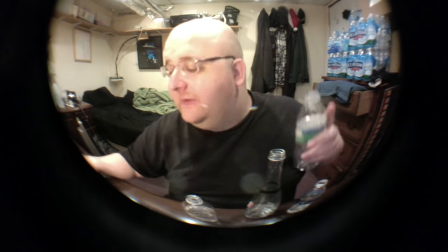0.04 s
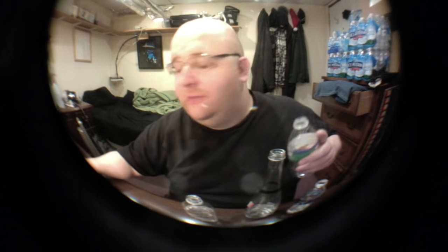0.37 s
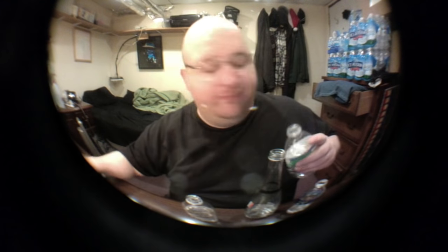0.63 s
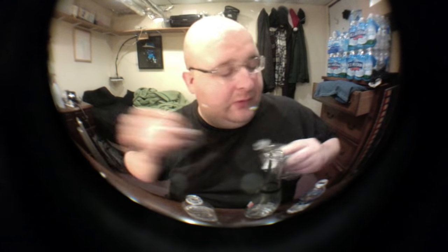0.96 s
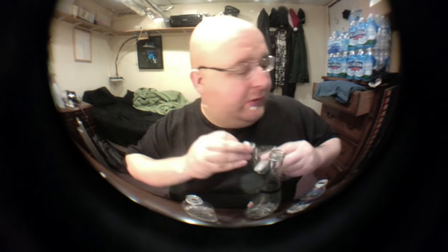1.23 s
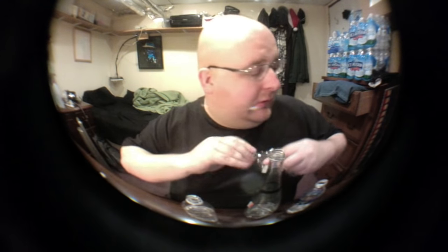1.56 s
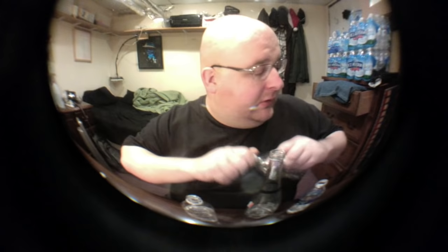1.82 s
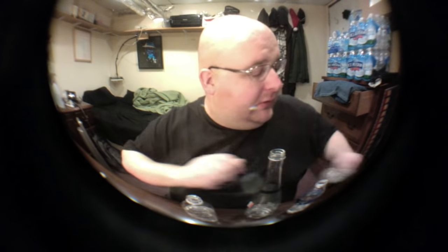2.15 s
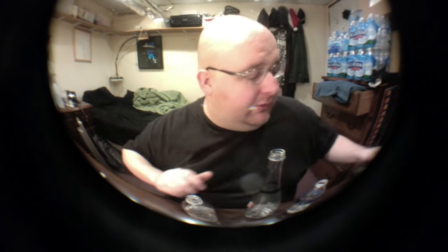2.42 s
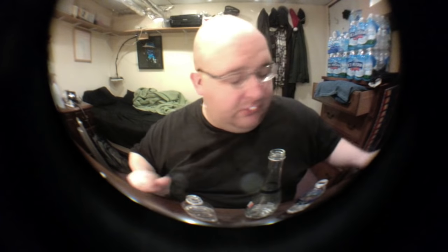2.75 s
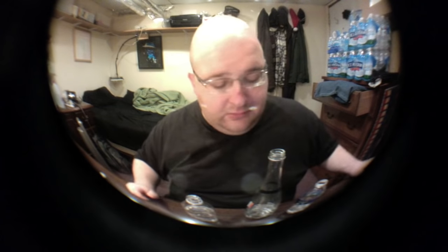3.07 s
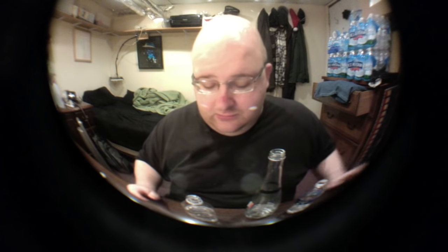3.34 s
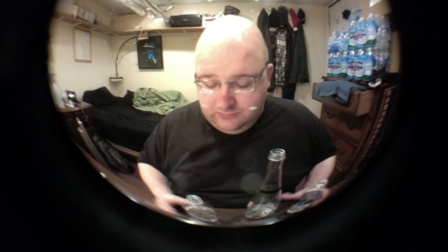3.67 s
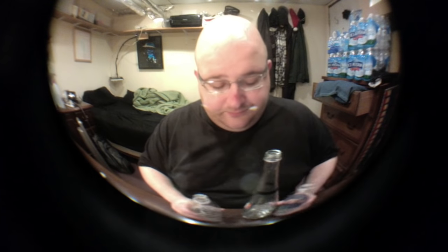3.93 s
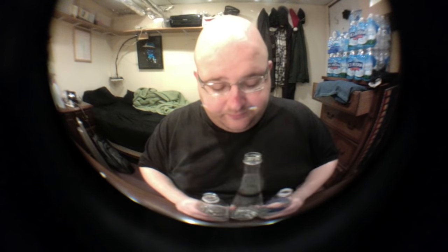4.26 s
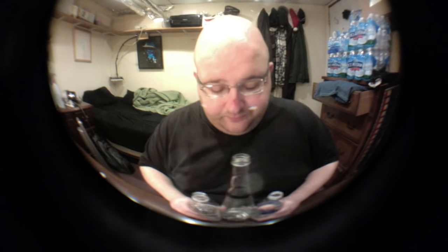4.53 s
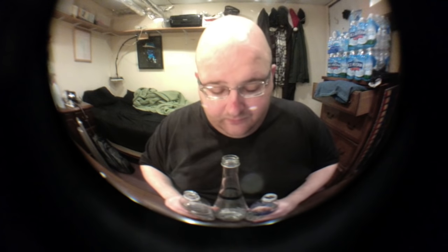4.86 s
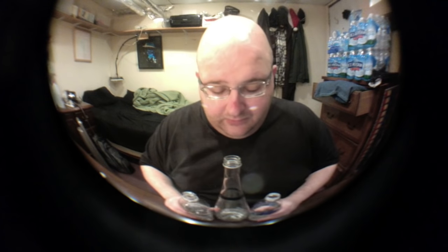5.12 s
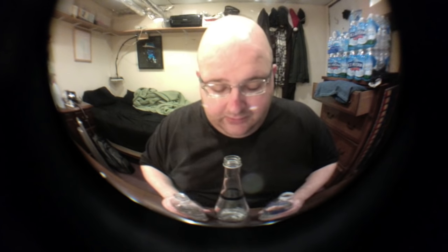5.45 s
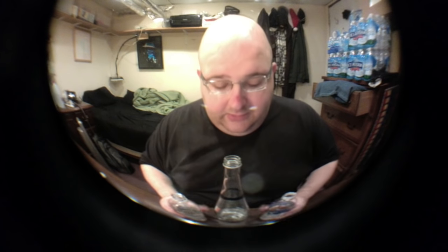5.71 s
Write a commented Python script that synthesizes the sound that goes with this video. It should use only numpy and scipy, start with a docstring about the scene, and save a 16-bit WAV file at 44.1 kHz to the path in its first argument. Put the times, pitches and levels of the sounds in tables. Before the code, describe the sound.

In a small room with a faint electrical hum, a plastic bottle crackles loudly and very close as a hand crushes its thin wall. It ticks and pops more softly, crinkles once more and rattles hollowly as it is set down. Afterwards, much quieter, glass bottles bump and slide on a tabletop, squeaking faintly and clinking once, before a last small tick.

```python
"""Loud snaps come first: a thin plastic water bottle is squeezed close by, and its wall buckles.
It creaks and crackles among small ticks and pops, then is put aside with a hollow clatter.
Other bottles are nudged about the table: they bump, slide, squeak faintly and clink.
A small room answers every snap; under it all lie a mains hum and a soft fan-like rush."""
import sys
import numpy as np
from scipy import signal
from scipy.fft import rfft, irfft, next_fast_len
from scipy.io import wavfile
from scipy.ndimage import map_coordinates

SR = 44100
rng = np.random.default_rng(int(sys.argv[2]) if len(sys.argv) > 2 else 0)


def unload_audio(sound):
    """Save the sound as a 16-bit wav file, at the path given as the first command line argument."""
    columns = np.transpose(np.atleast_2d(sound))
    # keep every value between -1 and 1, then stretch to whole-number steps
    steps = np.round(np.clip(columns, -1, 1) * 32767)
    wavfile.write(sys.argv[1], SR, steps.astype(np.int16))


N = 259572
TIME = np.arange(N) / SR  # seconds through the whole scene
T = np.arange(SR // 3) / SR  # seconds inside one short sound
TOP_HZ = 15750  # the microphone's upper limit


def amp(db):
    """Turn decibels into a gain to multiply by."""
    return 10 ** (np.asarray(db) / 20)


def unit(x):
    """Scale a sound to an average strength (rms) of 1."""
    return x / np.sqrt(np.mean(x ** 2) + 1e-20)


def unit_energy(x):
    """Scale a sound to a total energy of 1."""
    return x / np.linalg.norm(x)


def along(points, hz):
    """Read between (pitch_hz, value) points, spaced the way the ear hears pitch."""
    pitches, values = np.transpose(points)
    return np.interp(np.log(hz + 1), np.log(pitches + 1), values)


def level(rows):
    """A gain that glides through (time_s, level_db) rows and is silent outside them."""
    times, db = np.transpose(rows)
    return amp(np.interp(TIME, times, db, left=-120, right=-120))


def filtered(x, response):
    """Turn each frequency of x up or down by the gain response(hz)."""
    size = next_fast_len(N + SR // 4)
    return irfft(rfft(x, size) * response(np.fft.rfftfreq(size, 1 / SR)), size)[:N]


def band(x, low_hz, high_hz):
    """Keep one range of frequencies, scaled to a strength of 1."""
    edges = np.minimum([low_hz, high_hz], SR / 2 - 100)
    return unit(signal.sosfilt(signal.butter(3, edges, btype="band", fs=SR, output="sos"), x))


def resonances(f, modes):
    """How a thing that rings at (pitch_hz, width_hz, level_db) modes answers the frequencies f."""
    return sum(amp(db) * 1j * f * width / (hz ** 2 - f ** 2 + 1j * f * width) for hz, width, db in modes)


def noise(spectrum):
    """Noise of strength 1, coloured by (pitch_hz, level_db) points."""
    return unit(filtered(rng.standard_normal(N), lambda hz: amp(along(spectrum, hz))))


def wobble(per_s):
    """A smooth curve through per_s random values each second."""
    return map_coordinates(rng.standard_normal(int(N * per_s / SR) + 4), [TIME * per_s])


def fade(fade_s, t=T):
    """Die away by 60 dB in fade_s seconds."""
    return np.exp(-np.log(1000) * t / fade_s)


def rise(rise_s):
    """Swell from 0 towards 1, about two thirds of the way after rise_s seconds."""
    return 1 - np.exp(-T / rise_s)


def burst(contact_s):
    """A push of noise that is strongest after contact_s seconds."""
    return rng.standard_normal(len(T)) * (T / contact_s) ** 2 * np.exp(-2 * T / contact_s)


def add(track, start_s, sound):
    """Mix a sound into the track at start_s."""
    part = track[max(round(start_s * SR), 0):][:len(sound)]
    part += sound[:len(part)]


# the hum's tones, compared with the rush: pitch_hz, level_db
HUM_TONES = [(120, -8.5), (470, -15), (610, -8.5)]
# the colour of the rush: pitch_hz, level_db
RUSH_COLOUR = [(30, -42), (70, -17), (110, -4), (180, -11), (300, -8), (450, -4), (600, 0), (800, -5),
               (1100, -15), (2000, -18), (4000, -27), (6500, -28), (9000, -37), (15000, -43)]
# how loud hum and rush are over time: time_s, level_db
BACKGROUND_LEVEL = [(0, -61), (1.7, -60.5), (2.0, -65), (2.8, -62), (3.7, -59), (4.6, -67), (5.25, -67),
                    (5.6, -59.5)]
def hum_and_fan():
    """Mains hum with faint upper tones and the rush of a fan, slowly wavering together."""
    hum = sum(amp(db) * np.sqrt(2) * np.sin(2 * np.pi * (hz * TIME + rng.random()))
              for hz, db in HUM_TONES)
    level_db = np.interp(TIME, *np.transpose(BACKGROUND_LEVEL))
    return amp(level_db) * (hum + noise(RUSH_COLOUR))


# how long the small room rings: pitch_hz, fade_s
ROOM_FADES = [(150, .19), (500, .19), (1500, .17), (6000, .155), (15000, .125)]
def room_tail():
    """The room's blurred answer to a click; high sounds die sooner than low ones."""
    hz, t, spectrum = signal.stft(rng.standard_normal(len(T)), SR, nperseg=256)
    fading = spectrum * fade(along(ROOM_FADES, hz)[:, None], t)
    tail = signal.istft(fading, SR, nperseg=256)[1][:len(T)]
    return unit_energy(tail * rise(0.0016))


def with_echoes(x, echo_db, room_db=-6.5):
    """A short sound, its quick echoes off hand and table, and the room's tail."""
    direct = unit_energy(x)
    bounces = rng.standard_normal(len(T)) ** 3 * fade(0.095) * (T > .002)
    echoes = unit_energy(signal.fftconvolve(direct, bounces)[:len(T)])
    return direct + amp(echo_db) * echoes + amp(room_db) * room_tail()


def squeak(hold_s, pitch_hz, waver_hz=22, flutter_db=4.0):
    """Glass sticks and slips so fast that it sings one thin, unsteady note."""
    envelope = rise(0.0048) * fade(0.11, np.maximum(T - hold_s, 0))
    phase = 2 * np.pi * np.cumsum(pitch_hz + waver_hz * wobble(170)[:len(T)]) / SR
    return envelope * amp(flutter_db * wobble(70)[:len(T)]) * np.sin(phase)


# how loud the scraping is: time_s, level_db
SCRAPE_LEVEL = [(3.1, -85), (3.5, -68), (3.85, -66), (4.3, -70), (4.48, -90)]
# the colour of the scraping: pitch_hz, level_db
SCRAPE_COLOUR = [(300, -10), (700, 0), (1300, -3), (2200, -2), (4000, -10), (6500, -11), (8000, -18),
                 (15000, -24)]
# the rough notes of dragged glass: pitch_hz, width_hz, level_db
DRAG_NOTES = [(3230, 60, 0), (5430, 110, -4), (6900, 110, -5)]
# how loud those notes are together: time_s, level_db
DRAG_LEVEL = [(3.5, -86), (3.85, -76), (4.4, -86), (4.6, -96), (5.0, -80), (5.38, -79), (5.6, -92)]
# a glass base singing as it is pushed: start_s, hold_s, level_db, pitch_hz
GLASS_SQUEAKS = [(3.778, 0.048, -59.5, 3360), (3.82, .04, -65, 2100), (3.86, .04, -61.5, 3350),
                 (3.875, 0.049, -69, 5880), (3.96, 0.036, -72.5, 3350), (5.008, .02, -77.5, 3220)]
def sliding(judders_per_s=30, judder_db=1.67, catch_db=4.0):
    """Bottles whisper over the table in uneven pushes; the glass rings and squeaks where it catches."""
    track = amp(judder_db * wobble(judders_per_s)) * level(SCRAPE_LEVEL) * noise(SCRAPE_COLOUR)
    for hz, width_hz, db in DRAG_NOTES:
        ring = unit(filtered(rng.standard_normal(N), lambda f: resonances(f, [(hz, width_hz, 0)])))
        track += amp(db + catch_db * wobble(judders_per_s)) * level(DRAG_LEVEL) * ring
    for start_s, hold_s, db, hz in GLASS_SQUEAKS:
        add(track, start_s, amp(db) * squeak(hold_s, hz))
    return track


# the notes of a lightly touched glass bottle: pitch_hz, level_db, fade_s
GLASS_NOTES = [(1660, -15, 0.047), (2120, -1, 0.054), (2500, -8.5, .04), (2990, -2, 0.079),
               (3395, 1.5, 0.063), (3630, -8.5, .11), (5700, -8.5, 0.035), (6750, -11, 0.069),
               (7490, -7.5, 0.11), (8030, -7.5, 0.09), (8721, -9.5, 0.09), (9850, -10, 0.098),
               (12300, -17, 0.098), (15000, -15, .04)]
# the glass is grazed, then knocked: start_s, level_db, click_top_hz, click_db
GLASS_TOUCHES = [(4.6382, -61, 7560, -5), (4.643, -56.5, 3600, -8.5)]
def clinks(click_low_hz=1300, pure_db=2):
    """A held glass bottle is touched; the hand stops its ring almost at once."""
    track = np.zeros(N)
    for start_s, level_db, click_top_hz, click_db in GLASS_TOUCHES:
        ring = np.zeros(len(T))
        for hz, db, fade_s in GLASS_NOTES:
            blur = band(rng.standard_normal(len(T)), hz * .955, hz * 1.045)
            pure = amp(pure_db) * np.sin(2 * np.pi * hz * T)
            ring += amp(db) * fade(fade_s) * (blur + pure)
        touch = with_echoes(burst(contact_s=0.00099), echo_db=-8, room_db=-5.5)
        click = amp(click_db) * band(touch, click_low_hz, click_top_hz)
        add(track, start_s, amp(level_db) * (unit(ring * rise(0.0014)) + click))
    return track


# soft bumps on the squeezed bottle, later on the table top: start_s, level_db, pitch_hz
SOFT_BUMPS = [(.066, -27.5, 318.6), (.158, -27.5, 240), (.318, -38, 140), (.364, -34, 150),
              (0.42, -35, 135), (3.437, -40.5, 279), (3.459, -47.5, 290), (3.909, -41.5, 261),
              (3.932, -44, 150.3), (4.514, -52.5, 290), (5.15, -61, 269)]
def thumps(boom_fade_s=0.13, boom_db=-2, thud_db=-20):
    """A padded bump moves only a broad panel, which booms briefly."""
    track = np.zeros(N)
    for start_s, db, hz in SOFT_BUMPS:
        boom = np.sin(2 * np.pi * hz * T) * fade(boom_fade_s) * rise(0.0033)
        thud = band(with_echoes(burst(contact_s=0.009), echo_db=0), 80, 450)
        add(track, start_s, amp(db) * (amp(boom_db) * boom + amp(thud_db) * thud))
    return track


# the notes that table and bottle ring at: pitch_hz, width_hz, level_db
HOLLOW_NOTES = [(149, 28, -14), (243.7, 23, 1.5), (410.5, 26, 2), (501, 31, -4), (692, 27, -3),
                (785, 13, -5), (867, 31, -3), (1116, 23, -4), (1390, 32, -9), (1525, 57, 0),
                (1846, 36, -10), (2136, 42, -10.5)]
# the bottle knocks and rocks as it is put aside: start_s, thud_db, hollow_db, rattle_db, sizzle_db
BOTTLE_KNOCKS = [(2.170, -47.5, -43.5, -46, -49.5), (2.178, -48.5, -41.5, -43, -47.5),
                 (2.186, -52.5, -49.5, -54, -53), (2.229, -80, -52.5, -48, -57.5),
                 (2.288, -87, -64, -48, -55), (2.296, -90, -52.5, -41, -38.5),
                 (2.333, -72, -51.5, -50.5, -51), (2.3737, -67, -38, -44, -51),
                 (2.408, -86, -45.5, -53, -69), (2.421, -67, -44, -50.5, -78), (2.444, -86, -47, -61, -86),
                 (2.485, -39.5, -36, -37, -45.5), (2.492, -49.5, -52, -50, -61),
                 (2.523, -50.5, -44.5, -47.5, -67), (2.553, -62, -50, -55, -80)]
def knocks(direct_db=-9.0, shake_db=-19):
    """Each knock thuds in the wood, sounds the hollow bottle and rattles its skin."""
    track = np.zeros(N)
    for start_s, thud_db, hollow_db, rattle_db, sizzle_db in BOTTLE_KNOCKS:
        skin = with_echoes(burst(contact_s=0.0031), echo_db=-3, room_db=3.0)
        push = with_echoes(burst(contact_s=0.0037), echo_db=-7, room_db=-7)
        thud = amp(thud_db) * (band(push, 140, 540) + amp(shake_db) * band(push, 35, 150))
        hollow = amp(hollow_db) * (band(push, 660, 1468) + amp(-1.5) * band(push, 1295, 2470))
        rattle = amp(rattle_db) * (amp(-6) * band(skin, 1880, 3050) + amp(-0.5) * band(skin, 4260, 7200))
        sizzle = amp(sizzle_db) * band(skin, 8600, 13600)
        add(track, start_s, thud + hollow + rattle + sizzle)
    return filtered(track, lambda f: amp(direct_db) + resonances(f, HOLLOW_NOTES))


# small ticks and pops: start_s, level_db, low_pitch_hz, high_pitch_hz
SMALL_TICKS = [(0.7312, -24.5, 1625, 2720), (0.9338, -32, 3040, 3500), (0.959, -30.5, 3930, 4930),
               (1.1022, -30, 2106, 2600), (1.158, -41, 1430, 2750), (1.664, -46.5, 2310, 2440),
               (3.897, -40, 3590, 5000), (4.7199, -50.5, 2840, 3450), (5.313, -52.5, 4265, 9900),
               (5.8215, -35.5, 1570, 2487)]
def pops(ring_db=-31, ring_fade_s=0.059):
    """Small, short ticks and pops, each ringing at two pitches."""
    track = np.zeros(N)
    for start_s, db, low_hz, high_hz in SMALL_TICKS:
        push = with_echoes(burst(contact_s=0.0015), echo_db=-5, room_db=-5.5)
        low_tick = amp(-28) * band(push, low_hz * 0.827, low_hz * 1.132)
        high_tick = amp(-26) * band(push, high_hz * 0.876, high_hz * 1.17)
        notes = sum(np.sin(2 * np.pi * hz * T) for hz in (low_hz, high_hz))
        ring = amp(ring_db) * unit(notes * fade(ring_fade_s) * rise(0.0024))
        add(track, start_s, amp(db) * (low_tick + high_tick + ring))
    return track


def grip(full_grip_s, hold_s, level_db, change_db_per_s, build_db_per_s=649.5, release_db_per_s=798):
    """The gain of one squeeze: it builds, is held and lets go."""
    t = TIME - full_grip_s
    building = build_db_per_s * np.minimum(t, 0)
    holding = change_db_per_s * np.clip(t, 0, hold_s)
    letting_go = release_db_per_s * np.maximum(t - hold_s, 0)
    return amp(level_db + building + holding - letting_go)


# squeezes and light shifts of the hand: full_grip_s, hold_s, level_db, change_db_per_s
HAND_SQUEEZES = [(.16, 0.31, -44, 5), (1.442, 0.065, -24, -160), (1.785, 0.034, -71.5, -100),
                 (2.05, 0.094, -71.5, 70)]
def crumpling(ticks_per_s=3500, spread_db=2.0, room_db=-3):
    """Countless tiny creases crackle while the hand squeezes, and the room answers."""
    ticks = (rng.random(N) < ticks_per_s / SR) * rng.standard_normal(N)
    ticks *= amp(spread_db * rng.standard_normal(N))
    crackle = unit(band(ticks, 1800, 15500) + amp(-7.5) * band(ticks, 640, 7500))
    crackle *= sum(grip(*squeeze) for squeeze in HAND_SQUEEZES)
    return crackle + amp(room_db) * signal.fftconvolve(crackle, room_tail())[:N]


def snap(level_db, bright_db, extra_body_db, pitch_hz, ring_cycles=55):
    """A patch of wall flips with a crack and rings briefly: tight creases bright, broad panels dull."""
    echo_db = -3 + 0.055 * bright_db + 0.022 * level_db  # dull or small snaps echo less
    flip = with_echoes(burst(contact_s=0.0006), echo_db, room_db=echo_db - 0.5)
    note = np.cos(2 * np.pi * pitch_hz * T) * fade(ring_cycles / pitch_hz)
    ring = amp(-16.5) * unit(with_echoes(note, echo_db - 0.5, room_db=echo_db - 12))
    # big, dull snaps move more of the bottle; only the big ones shake out any bass
    body_db = -32.5 - 0.53 * bright_db + 0.9 * level_db + extra_body_db
    body = amp(body_db - 4.5) * band(flip, 270, 1100)
    bass = amp(body_db - 25 + 0.45 * level_db) * band(flip, 90, 260)
    panel = amp(-21 - 0.67 * bright_db) * band(flip, 1300, 3610)
    crack = amp(-10.5) * band(flip, 3680, 6500)
    # the highest part beams away from the microphone and arrives mostly as echoes
    scattered = unit_energy(flip) + amp(0.5) * room_tail()
    sizzle = amp(-9.5 + 0.41 * bright_db) * band(scattered, 7600, 17000)
    return amp(level_db - 13.5) * (bass + body + panel + crack + ring + sizzle)


def creak(start_s=.6283, level_db=-26, slips=11, gap_s=.0088, slowing=1.033, scatter=.07):
    """A crease sticks and slips in a run of tiny snaps that gradually slow and weaken."""
    track = np.zeros(N)
    gaps = gap_s * slowing ** np.arange(slips) * np.exp(scatter * rng.standard_normal(slips))
    for k, slip_s in enumerate(start_s + np.cumsum(gaps) - gaps[0]):
        slip_db = level_db - 0.41 * k + rng.standard_normal()
        add(track, slip_s, snap(slip_db, bright_db=-5.5, extra_body_db=-3.5, pitch_hz=6700))
    return track


# the snaps of the buckling wall: start_s, level_db, bright_db, extra_body_db, pitch_hz
WALL_SNAPS = [(0.0443, -8, -7.5, 14.5, 1785), (0.0677, -8.5, -16.5, 14, 5260),
              (0.1028, -21.5, -23, 17, 2620), (0.115, -12.5, -17.5, 15.5, 2940),
              (0.1516, -6, -16, 12, 5650), (.1562, -5, -12, 9.5, 5160), (.159, -1, -6, 8.5, 6300),
              (0.192, -12.5, -24, 10, 1480), (0.1985, -3, 3, 14.5, 6060), (.212, -9, -14, 11, 5300),
              (0.235, -6, -7.5, 8, 6000), (.2452, -6, -15, 9, 4660), (0.2559, -8.5, -19, 13.5, 4360),
              (0.2691, -8.5, -14, -1, 947), (.2797, 0, -1, 5, 5940), (.2855, -9.5, -8, 14, 2860),
              (.291, -8, -21.5, -8, 2520), (0.3181, 2, -4.5, -2.5, 6830), (0.3329, -2.5, -15.5, 0.5, 4130),
              (0.3403, -5.5, -4, -2, 6250), (0.3645, 0.5, 1, -2, 6280), (0.3794, 0, -13.5, -4, 3020),
              (.3845, -6.5, 6, -7, 6330), (0.421, -1, -13.5, 7, 2890), (0.4896, -14, -12.5, -9, 6480),
              (.519, -24, -9, 0, 5960), (.619, -44, -6, 6, 5240), (0.7483, -29, -9, -2, 6400),
              (0.7791, -31, -15, -4, 1470), (0.7936, -29, -5, -5, 6600), (0.8495, -20.5, 3, -7, 5010),
              (0.97, -26, -2, -9, 5450), (0.978, -30, 0, -4, 5660), (1.0387, -30.5, -14, -5, 4380),
              (1.087, -36, -10, -4, 5730), (1.114, -32, -13, -2, 4300), (1.123, -40.5, -18, -13, 6030),
              (1.1747, -32.5, -10.5, 2, 6900), (1.1914, -33, -9, 8, 5540), (1.202, -37, -4, 2, 6800),
              (1.2087, -27, -12.5, 26, 2360), (1.216, -46, -10, 3, 6700), (1.2795, -33.5, -15, -4, 5940),
              (1.2926, -38.5, 3.5, 1, 6700), (1.302, -41, -25.5, 0, 6000), (1.32, -41.5, 0, 1, 6300),
              (1.3601, -33.5, -20.5, 21, 6050), (1.378, -35, -8, 1, 2370), (1.417, -35, -3, -5, 4400),
              (1.424, -26.5, 8, -2, 4900), (1.4333, -20, -12, 16, 5560), (1.4408, -17.5, -14.5, 7, 5600),
              (1.444, -15, -6, 6, 4930), (1.5156, -10.5, -14.5, 8.5, 3980), (1.5483, -22.5, -12, -8, 5450),
              (1.534, -32, -9, 3, 1250), (1.5584, -26.5, -21, -1, 2400)]
def buckling(neighbour_delay_s=.0035, neighbour_db=-12.5):
    """The wall gives way snap by snap; each one trips a weaker neighbour of another pitch."""
    track = np.zeros(N)
    chance = np.exp(0.33 * rng.standard_normal((len(WALL_SNAPS), 2)))
    for (start_s, db, bright_db, extra_body_db, hz), (lateness, detune) in zip(WALL_SNAPS, chance):
        add(track, start_s, snap(db, bright_db, extra_body_db, hz))
        neighbour = snap(db, bright_db, extra_body_db, min(hz * detune, TOP_HZ))
        add(track, start_s + neighbour_delay_s * lateness, amp(neighbour_db) * neighbour)
    return track


# the broad colour of the squeezed bottle's snaps, creaks and crackle: pitch_hz, level_db
BROAD_COLOUR = [(100, -3), (250, -1.5), (450, -2), (800, 5), (1200, -1.5), (1700, -3), (2400, -2),
                (3400, -5), (5000, -1.2), (6400, .5), (8000, 0), (11000, -.5), (13800, 1), (15500, -3.5)]
# narrow ringing pitches that colour every snap: pitch_hz, width_hz, level_db
SNAP_RESONANCES = [(800, 20, -4), (994, 6.7, -1.5), (1560, 44, -10), (1729, 18, -2.5), (2120, 31, -4.5),
                   (2510, 31, -0.5), (2790, 150, -3.5), (4450, 120, -4), (5474, 33, -5.5), (5680, 23, -4.5),
                   (5880, 53, -1), (6320, 22, -3), (6450, 42, -4), (9160, 95, 1)]
def snap_colour(f, count=60, low_hz=900, high_hz=15000, width_hz=32, ring_db=-2.0):
    """Every snap shares one broad colour and many narrow ringing pitches, listed and random."""
    pitches = low_hz + (high_hz - low_hz) * (np.arange(count) + rng.random(count)) / count
    signs = rng.choice([-1, 1], count)
    crowd = sum(sign * resonances(f, [(hz, width_hz, ring_db)]) for hz, sign in zip(pitches, signs))
    return amp(along(BROAD_COLOUR, f)) * (1 + resonances(f, SNAP_RESONANCES) + crowd)


def scene(wall_db=-1.0):
    """The handled bottles over the room's hum and rush, in one channel."""
    crackle = crumpling()
    squeezed = amp(wall_db) * filtered(buckling() + creak() + crackle, snap_colour)
    return (squeezed + pops() + knocks() + thumps() + clinks() + sliding() + hum_and_fan())[None]


def record(dry, ceiling=0.96, hardness=12):
    """The microphone overloads on the loudest snaps and cuts off sound above its upper limit."""
    squashed = dry[0] / (1 + np.abs(dry[0] / ceiling) ** hardness) ** (1 / hardness)
    return filtered(squashed, lambda hz: 1 / (1 + (hz / TOP_HZ) ** 200))[None]


dry = scene()
out = record(dry)
unload_audio(out)
```